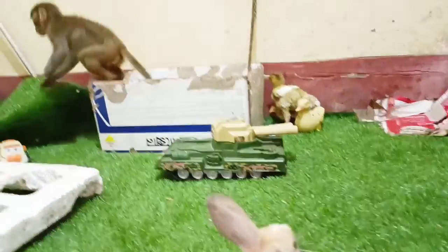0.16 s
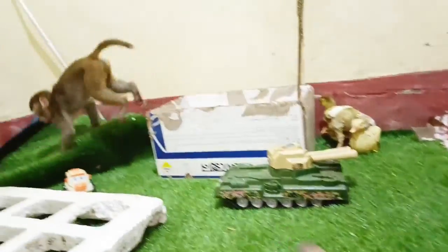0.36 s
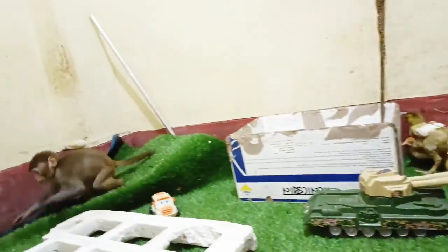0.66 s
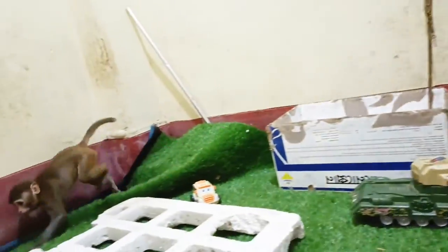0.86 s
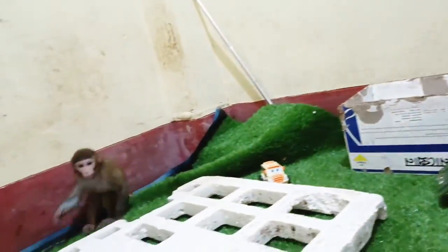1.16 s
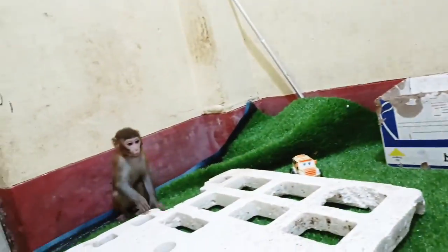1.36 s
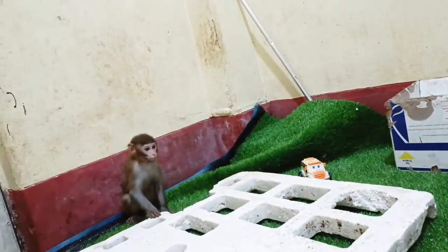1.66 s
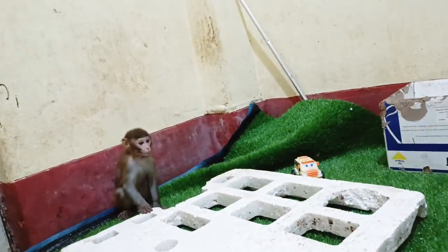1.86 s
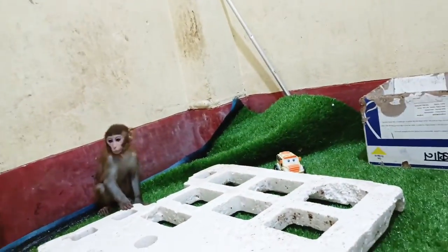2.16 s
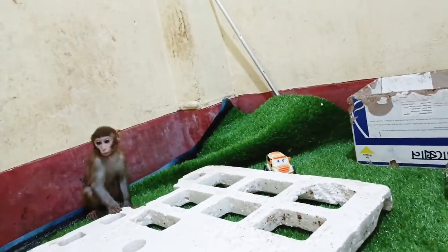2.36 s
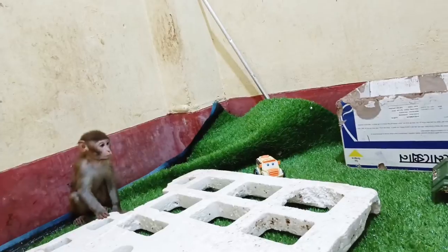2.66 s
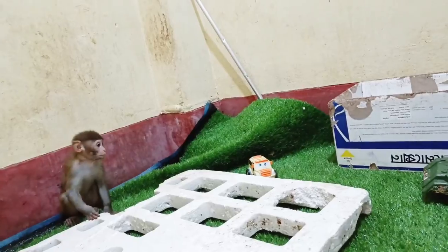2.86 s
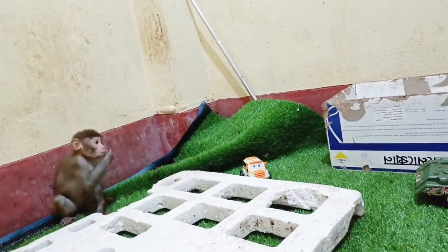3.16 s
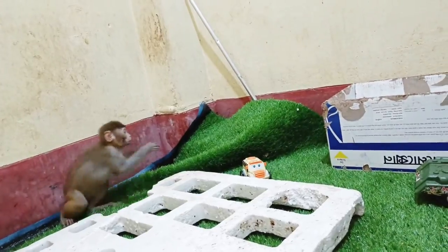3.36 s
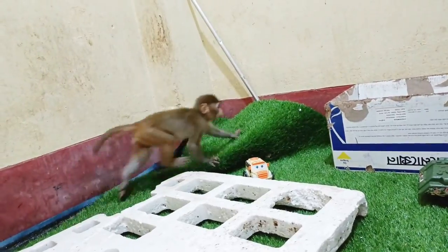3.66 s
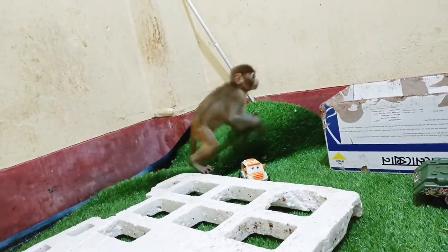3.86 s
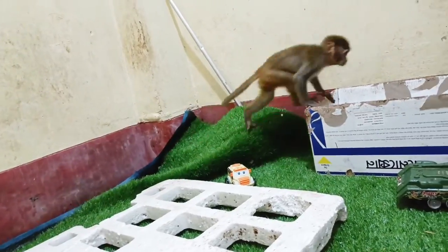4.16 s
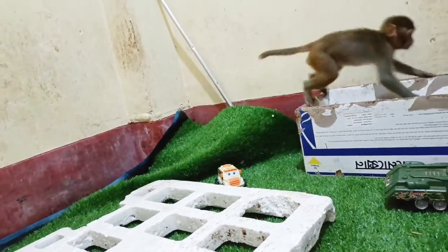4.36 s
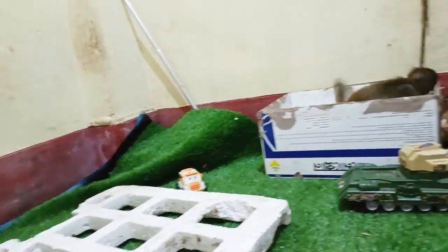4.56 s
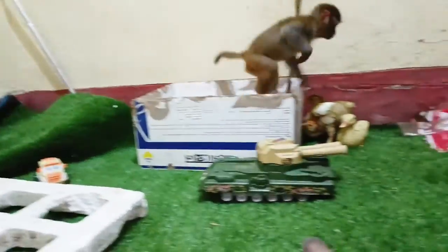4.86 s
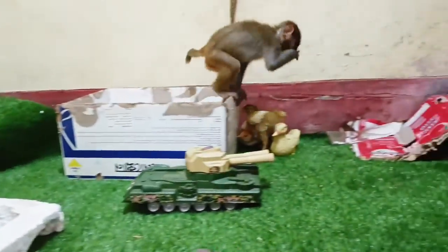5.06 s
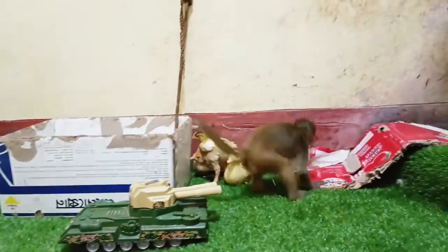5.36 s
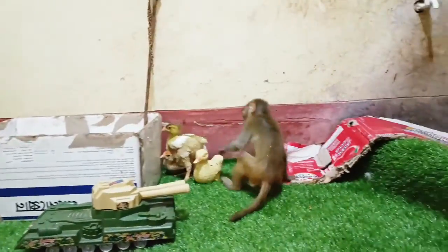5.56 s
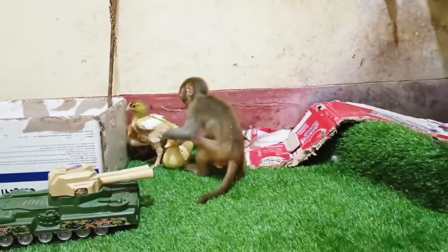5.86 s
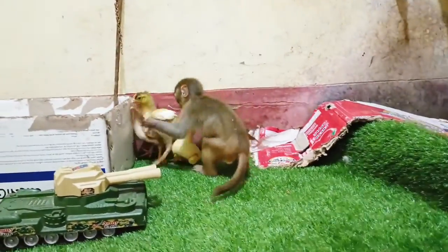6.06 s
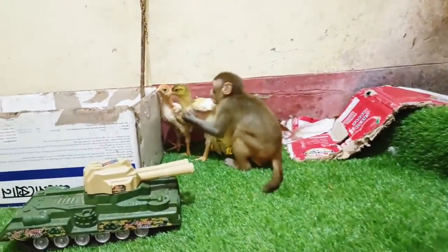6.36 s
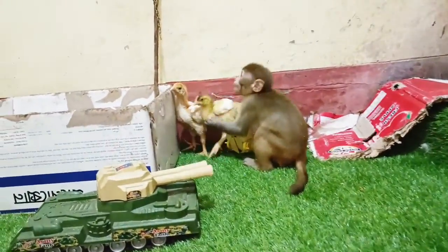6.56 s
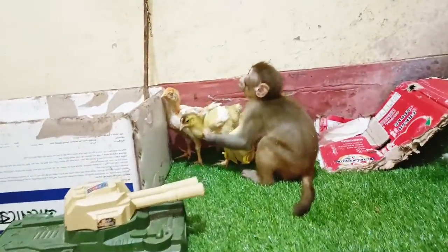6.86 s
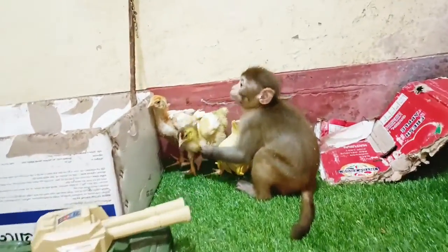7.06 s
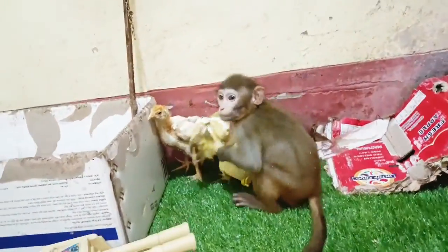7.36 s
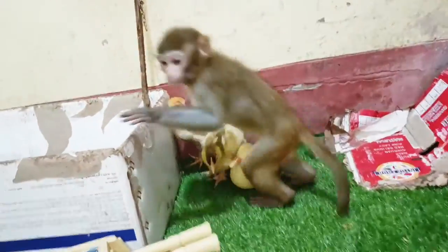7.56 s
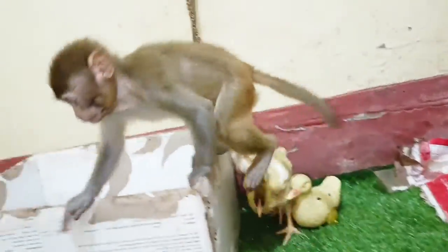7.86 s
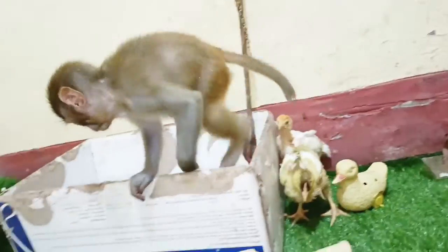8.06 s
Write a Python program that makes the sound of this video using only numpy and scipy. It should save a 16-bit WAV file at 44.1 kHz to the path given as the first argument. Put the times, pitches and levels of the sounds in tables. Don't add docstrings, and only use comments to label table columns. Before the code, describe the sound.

Shrill repeated chick peeps ring off bare walls, followed by a small monkey thumping a cardboard box, scuffing and tapping claws among brief chirps.

```python
import sys
import numpy as np
from scipy import signal
from scipy.fft import rfft, irfft, next_fast_len
from scipy.io import wavfile
from scipy.ndimage import uniform_filter1d, minimum_filter1d

SR = 44100
rng = np.random.default_rng(int(sys.argv[2]) if len(sys.argv) > 2 else 0)


def to_linear_factor(level_db):
    exponent = np.asarray(level_db, float) / 20
    return 10 ** exponent


def materialize(psi):
    bounded = np.clip(np.atleast_2d(psi).T, -1, 1)
    quanta = np.round(bounded * 32767).astype(np.int16)
    wavfile.write(sys.argv[1], SR, quanta)


N = 361113
LEAD_S = 0.7


def evened(x):
    return x / np.sqrt(np.mean(x ** 2) + 1e-20)


def read(points, hz):
    f, value = np.transpose(points)
    return np.interp(np.log(hz + 1), np.log(f + 1), value)


def coloured(x, points):
    size = next_fast_len(x.shape[-1])
    gain = to_linear_factor(read(points, np.fft.rfftfreq(size, 1 / SR)))
    return irfft(rfft(x, size) * gain, size)[..., :x.shape[-1]]


def wobble(count, size):
    once = uniform_filter1d(rng.standard_normal(count), size)
    return evened(uniform_filter1d(once, size))


def window(t, length, rise, fall):
    nearest_end = np.minimum(t / rise, (length - t) / fall)
    return np.sin(np.pi / 2 * np.clip(nearest_end, 0, 1)) ** 2


def add(mix, s, sound):
    part = mix[..., round((s + LEAD_S) * SR):][..., :sound.shape[-1]]
    part += sound[..., :part.shape[-1]]


def track(source, rows, channels=1):
    mix = np.zeros((channels, N + round(LEAD_S * SR)))
    for row in rows:
        add(mix, *source(*row))
    return mix


# pitch_hz, level_db (per Hz)
HUSH_COLOUR = [(15, -59.5), (25, -44), (80, -19.5), (141, -1), (270, -13.5), (531, -13.5), (1040, -14),
               (1700, -17.5), (2280, -13.5), (2610, -17), (2990, -16), (4740, -28.5), (5730, -22),
               (7710, -40.5), (16000, -36.5)]
# pitch_hz, likeness (1 = the same)
LIKENESS = [(60, 1), (180, 0.93), (550, 0.58), (1650, -0.52), (4970, 0.32), (15000, 0.58)]


def hush():
    frames, hz = N // 256 + 5, np.fft.rfftfreq(1024, 1 / SR)
    a, b, c, d, patches = rng.standard_normal((frames, 513, 5)).T
    patches = uniform_filter1d(patches, size=3, axis=0)
    patches = evened(uniform_filter1d(patches, size=30, axis=1))
    same = np.clip(read(LIKENESS, hz), -1, 1)[:, None]
    left = a + 1j * b
    right = same * left + np.sqrt(1 - same ** 2) * (c + 1j * d)
    z = np.array([left, right]) * to_linear_factor(read(HUSH_COLOUR, hz)[:, None] + 4.8 * patches)
    noise = signal.istft(z, nperseg=1024, noverlap=768)[1][:, :N]
    return to_linear_factor(-52.5 + 3.5) * evened(noise)


# pitch_hz, time_to_fall_60_db_s
ECHO_TIME = [(150, 1), (500, 0.84), (1200, 0.75), (3100, 0.74), (6000, 0.67), (9000, 0.41), (15000, 0.31)]


def room(x):
    taps = np.zeros((2, SR))
    at = np.arange(200, SR - 20, 20) + rng.integers(0, 20, (2, (SR - 201) // 20))
    np.put_along_axis(taps, at, rng.choice([-1., 1.], at.shape), 1)
    hz, t, z = signal.stft(taps, SR, nperseg=256)
    same = np.clip(read(LIKENESS, hz), 0, 1)[:, None]
    both = np.array([z[0], same * z[0] + np.sqrt(1 - same ** 2) * z[1]])
    fading = both * to_linear_factor(-60 * t / read(ECHO_TIME, hz)[:, None])
    tail = signal.istft(fading, SR, nperseg=256)[1]
    return signal.fftconvolve(x[None], tail / np.linalg.norm(tail[0]), axes=1)[:, :len(x)]


def fuzzy_tone(s, length, db, hz, width_hz):
    count = int(length * SR)
    r = np.exp(-2 * np.pi * width_hz / SR)
    noise = rng.standard_normal(count) + 1j * rng.standard_normal(count)
    fuzz = signal.lfilter([1], [1, -2 * r, r * r], noise)
    tone = (fuzz * np.exp(2j * np.pi * hz * np.arange(count) / SR)).real
    return s, to_linear_factor(db) * evened(tone) * signal.windows.tukey(count, .25)


# start_s, length_s, level_db, pitch_hz
AIR_PUFFS = [
    (5.75, .3, -70, 55),
    (6.55, .3, -75, 55),
    (7.25, .3, -73, 55),
]


def air_puff(*row):
    return fuzzy_tone(*row, width_hz=18)


# start_s, length_s, level_db, pitch_hz
FAR_PEEPS = [(4.1, .2, -54, 2050), (4.45, .13, -64, 2050), (4.17, .2, -64, 4100), (4.0, .55, -61, 2800),
             (4.15, .15, -67, 4950), (4.69, .05, -55, 2800), (4.81, .05, -53, 2800), (4.86, .14, -44, 2450),
             (5.24, .26, -54, 3250), (5.25, .2, -62, 2350), (5.25, .25, -60, 2800), (5.3, .15, -63, 2050),
             (5.25, .2, -67, 4950), (5.27, .2, -69, 5850), (6.16, .12, -56, 1100), (6.2, .3, -68, 4500),
             (6.7, .2, -67, 4500), (6.7, .15, -73, 7000), (6.7, .25, -71, 5100), (6.3, .5, -63, 3100),
             (6.7, .12, -67, 3550), (7.05, .18, -68, 3700), (7.0, .45, -63, 2850), (7.0, .4, -67, 2270),
             (8.0, .12, -60, 2800), (7.85, .33, -63, 3100), (7.0, .45, -64, 3300)]


def far_peep(*row):
    return fuzzy_tone(*row, width_hz=16.6)


# start_s, length_s, level_db, pitch_hz
BOX_SQUEAKS = [(1.85, .2, -46, 2500), (4.394, .05, -50, 1300), (4.75, .2, -58, 4150),
               (4.67, .15, -56, 5900), (5.24, .42, -55, 4150), (5.68, .1, -56, 1100),
               (6.05, .08, -58, 1100), (6.94, .08, -60, 1150), (7.77, .06, -54, 1150)]


def box_squeak(*row):
    return fuzzy_tone(*row, width_hz=140)


def scuff(s, rise, t60, db, low_hz, high_hz):
    t = np.arange(26000) / SR
    grains = rng.standard_normal((2, len(t))) * to_linear_factor(1.2 * wobble(len(t), size=60))
    hiss = coloured(grains, [(low_hz * 0.86, -30), (low_hz, 0), (high_hz, -5), (high_hz * 1.3, -30)])
    swell = np.minimum(t / rise, 1) ** 2
    return s, to_linear_factor(db - 60 * np.maximum(t - rise, 0) / t60) * swell * evened(hiss)


# start_s, rise_s, time_to_fall_60_db_s, level_db
PAW_STEPS = [(1.1, 0.025, 0.58, -44), (1.6, 0.0097, 0.19, -42), (1.93, 0.015, 0.49, -45.5),
             (5.455, 0.0091, 0.96, -43), (5.484, 0.00207, 0.48, -28.5), (6.02, .03, .98, -47),
             (7.52, .02, 1, -45)]


def paw(*row):
    return scuff(*row, low_hz=555, high_hz=2040)


# start_s, rise_s, time_to_fall_60_db_s, level_db
FUR_BRUSHES = [(4.118, .07, 0.94, -50.5), (4.588, .027, .9, -51.5), (4.66, .01, 0.84, -43),
               (5.249, .021, 1, -53.5), (5.46, .023, 0.33, -47), (6.689, .03, .9, -60),
               (7.409, 0.034, 0.49, -36), (7.551, 0.15, 0.47, -47), (7.66, 0.026, 0.87, -48.5),
               (8.1, .02, .2, -66)]


def fur(*row):
    return scuff(*row, low_hz=3300, high_hz=14300)


# start_s, rise_s, time_to_fall_60_db_s, level_db
CLAW_TAPS = [(6.292, 0.0023, .35, -43.5), (6.48, 0.005, 0.17, -52), (7.235, .004, 0.22, -47),
             (7.66, 0.014, 0.62, -37), (7.765, .001, 0.035, -31.5), (7.77, .01, 0.35, -38)]


def claw(*row):
    return scuff(*row, low_hz=930, high_hz=8100)


# pitch_hz, level_db, time_to_fall_60_db_s
BOX_PANELS = [(137.95, -7.5, 0.87), (153.7, 2, 0.18), (211.9, -4, 0.14)]
# pitch_hz, level_db (per Hz)
RATTLE_COLOUR = [(100, -14.5), (250, 0.5), (600, -9), (1050, -17.5), (1500, -26), (3000, -41), (9000, -52)]
# start_s, peak_db, panel_pitch_hz, hardness_db, dullness_db
BOX_KNOCKS = [(0.0, -24.5, 133, -20.5, -14), (0.062, -15.5, 134.5, -46, -8), (0.202, -6.5, 213.4, -30.5, 2),
              (0.359, -17.5, 211, -15.5, 18), (0.41, -17, 194, -5.5, -7), (4.146, -31, 138, -31, 5),
              (4.213, -32, 148, -23.5, 11), (4.328, -24, 148, -42, 6), (4.396, -41, 148, -26, -13),
              (4.481, -30, 151, -25, 10), (4.575, -23, 251, -19.5, 1), (4.657, -16.5, 183, -15, 3),
              (4.699, -16, 132, -8.5, 1), (4.849, -17, 131, -24, 17), (4.967, -19.5, 167, -47, 6),
              (5.068, -25.5, 178, -31.5, -9), (5.129, -31, 149, -30, 6), (5.198, -41.5, 163, -6, -4),
              (5.422, -34, 171.6, -10, -7), (7.907, -19.5, 150, -34, -2), (7.991, -28, 129.6, -39, 6),
              (8.043, -59, 164, -12.5, 4), (8.077, -27, 274, 2, 12.5), (8.136, -44, 252, -3, 24)]


def knock(s, db, hz, hard_db, dull_db):
    t = np.arange(int(.5 * SR)) / SR
    thump = np.sin(2 * np.pi * hz * t) * to_linear_factor(-60 * t / 0.068)
    hum = 0
    for panel_hz, panel_db, t60 in BOX_PANELS:
        hum = hum + to_linear_factor(panel_db - 60 * t / t60) * np.sin(2 * np.pi * (panel_hz * t + rng.random()))
    colour = [(f, d - dull_db * (f > 1200)) for f, d in RATTLE_COLOUR]
    rattle = evened(coloured(rng.standard_normal(len(t)), colour)) * to_linear_factor(hard_db - 60 * t / 0.21)
    soft_start, sharp_start = np.minimum(t / .008, 1), np.minimum(t / .0012, 1)
    return s, to_linear_factor(db) * ((thump + to_linear_factor(-7) * hum) * soft_start + rattle * sharp_start)


# start_s, length_s, first_pitch_hz, last_pitch_hz, level_db
BIRD_CHIRPS = [(5.026, 0.047, 2900, 2750, -38), (5.851, 0.088, 3490, 2907, -34.5),
               (5.873, 0.033, 3800, 3570, -34), (6.017, 0.1, 3200, 2334, -31.5),
               (6.296, 0.043, 3000, 2765, -27.5), (7.24, 0.053, 2900, 2670, -48),
               (7.512, 0.0344, 2970, 3490, -27), (7.532, 0.075, 3200, 2534, -25),
               (7.668, 0.079, 3300, 2294, -29.5)]
TRILL_S, TRILL_HZ, CHIRP_RISE_S = 0.019, 322, 0.019


def chirp(s, length, first_hz, last_hz, db):
    t = np.arange(5000) / SR
    hz = first_hz + (last_hz - first_hz) * np.minimum(t / length, 1) ** .8
    hz = hz - TRILL_HZ * np.minimum(t / TRILL_S, 1) * np.cos(2 * np.pi * t / TRILL_S)
    db = db + 3 * wobble(len(t), size=120)
    turn = 2 * np.pi * np.cumsum(hz) / SR
    octave_db = -12 - abs(hz - 2950) / 60
    whistle = np.sin(turn) + to_linear_factor(octave_db) * np.sin(2 * turn)
    return s, to_linear_factor(db) * whistle * window(t, length, CHIRP_RISE_S, length / 2)


# pitch_hz, level_db (per Hz)
VOICE_BREAK_COLOUR = [(590, -56.5), (1000, -39.5), (2560, -16), (3080, -6), (3580, -17), (5500, -21.5),
                      (6110, -1.5), (7270, -69), (8450, -20.5), (16000, -42)]
EFFORT_DB = -14.5
BREAK_EARLY_S, BREAK_S, BREAK_DB = 0.032, 0.096, 1.5


def voice_break(s, length, *pitch):
    t = np.arange(8000) / SR
    puff = evened(coloured(rng.standard_normal(len(t)), VOICE_BREAK_COLOUR))
    shape = window(t, BREAK_S, BREAK_S / 2, BREAK_S / 2)
    return s + length - BREAK_EARLY_S, to_linear_factor(EFFORT_DB + BREAK_DB) * puff * shape


# pitch_hz, level_db
THROAT_COLOUR = [(820, -47), (1400, -26), (2610, -13), (3010, 2), (3160, -0.5), (3650, -6.5), (4080, 2.5),
                 (4610, -18), (5540, -4.5), (7370, -13), (8000, -17), (9420, -16), (10100, -25),
                 (16000, -24)]
# start_s, length_s, top_pitch_hz, pitch_gives_way_after_s, pitch_falls_for_s
BIRD_CRIES = [
    (-.6, 0.66, 1678, 0.58, 0.74),
    (0.174, 0.62, 1892, 0.22, 0.35),
    (1.004, 0.44, 1874, 0.24, 0.17),
    (1.704, 0.55, 1830, .22, .21),
    (2.509, 0.56, 1806, .22, .26),
    (3.364, 0.42, 1801, 0.19, .16),
]
SCOOP, SCOOP_S, SAG_HZ_PER_S = .12, .04, 120
LOW_HZ = 1499.4
ATTACK_S, ATTACK_DB, RELEASE_S, PUSH_DB = 0.022, -10, .03, 4
RASP_START, RASP_TOP, RASP_LOW = .25, .12, .2
RASP_END, CRACK_S = .3, .08


def cry(s, length, top_hz, hold, fall):
    t = np.arange(30000) / SR
    high = uniform_filter1d(np.clip(1 - (t - hold) / fall, 0, 1), size=1500)
    young = np.exp(-t / SCOOP_S)
    hz = LOW_HZ + (top_hz * (1 - SCOOP * young) - SAG_HZ_PER_S * t - LOW_HZ) * high
    effort_db = EFFORT_DB + ATTACK_DB * np.exp(-t / ATTACK_S) + PUSH_DB * (1 - high)
    rasp = RASP_LOW + (RASP_TOP - RASP_LOW) * high + RASP_START * young
    rasp = np.clip(rasp + RASP_END * np.exp((t - length) / CRACK_S), 0, 1)
    hz = hz * (1 + 0.0541 * rasp ** 1.29 * wobble(len(t), size=40))
    turns = np.cumsum(hz) / SR
    grain = .05 + .5 * rasp
    voice = 0
    for k in range(1, 11):
        strength = to_linear_factor(read(THROAT_COLOUR, k * hz)) * (k * hz < 16000)
        slip = max(k - 3, 0) * grain * wobble(len(t), size=50)
        voice = voice + strength * np.cos(2 * np.pi * (k * turns + rng.random()) + slip)
    voice = voice / np.sqrt(uniform_filter1d(voice ** 2, size=2000) + 1e-12)
    shake = 1 + 0.086 * rasp * wobble(len(t), size=40)
    return s, to_linear_factor(effort_db) * voice * shake * window(t, length, RELEASE_S, RELEASE_S)


# pitch_hz, left_minus_right_db
PORT_TILT = [(60, 3), (99, -7), (160, 10), (270, 2), (450, -6), (740, -13), (1220, -3), (2010, -2),
             (3330, -16), (5500, -16), (9080, 16.5), (15000, -5)]


def at_ports(bird):
    left = coloured(np.roll(bird, 8), [(f, db / 2) for f, db in PORT_TILT])
    right = coloured(bird, [(f, -db / 2) for f, db in PORT_TILT])
    return np.array([left, right])


def scene():
    scuffs = track(paw, PAW_STEPS, channels=2) + track(fur, FUR_BRUSHES, channels=2)
    scuffs = scuffs + track(claw, CLAW_TAPS, channels=2)
    far = track(far_peep, FAR_PEEPS) + track(box_squeak, BOX_SQUEAKS) + track(air_puff, AIR_PUFFS)
    far = to_linear_factor(9) * far[0]
    box = coloured(track(knock, BOX_KNOCKS)[0], [(30, -4.5), (95, -15), (125, 1.5), (20000, 12.5)])
    chirps = track(chirp, BIRD_CHIRPS)[0]
    bird = (track(cry, BIRD_CRIES) + track(voice_break, BIRD_CRIES[1:]))[0]
    small = to_linear_factor([[-3], [0]]) * np.array([np.roll(chirps, -3) + np.roll(far, -8), chirps + far])
    near = to_linear_factor(-7.0) * at_ports(bird) + small + to_linear_factor(-1.0) * box
    box_echo = coloured(box, [(200, -1.9), (350, 2.2), (20000, 1)])
    echoes = to_linear_factor([[-6], [-3]]) * room(bird + chirps + to_linear_factor(-3) * far) + room(box_echo)
    return (near + echoes + scuffs)[:, -N:] + hush()


def top_cut(x):
    return signal.sosfilt(signal.butter(12, 16500, fs=SR, output="sos"), x)


def record(dry):
    peak = -minimum_filter1d(-abs(dry).max(0), size=441)
    held = dry / uniform_filter1d(np.maximum(peak / .93, 1), size=441)
    z = signal.stft(held, nperseg=1024, noverlap=512)[2]
    power = (abs(z[:, :512]) ** 2).mean(0)
    power_db = 10 * np.log10(power.reshape(64, 8, -1).mean(1) + 1e-20)
    loudest_db = -minimum_filter1d(-power_db, size=9, axis=0)
    reach_db = np.interp(np.arange(64), [2, 3, 14, 20, 40], [99, 41, 38, 31, 19])[:, None]
    kept = np.repeat(power_db > loudest_db - reach_db, 8, axis=0)
    kept = np.vstack([kept, kept[-1:]])
    gated = signal.istft(z * kept, nperseg=1024, noverlap=512)[1][:, :N]
    return top_cut(gated)


dry = scene()
out = record(dry)
materialize(out)
```